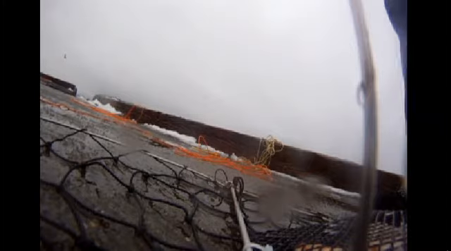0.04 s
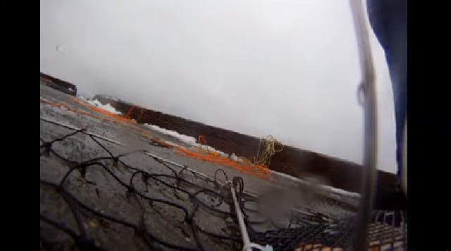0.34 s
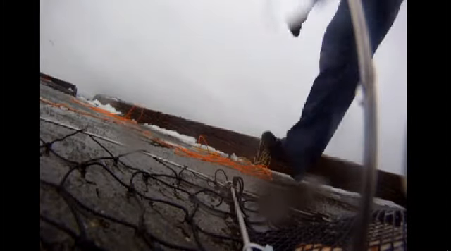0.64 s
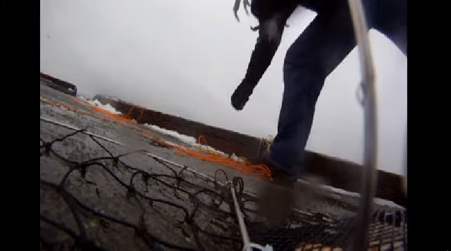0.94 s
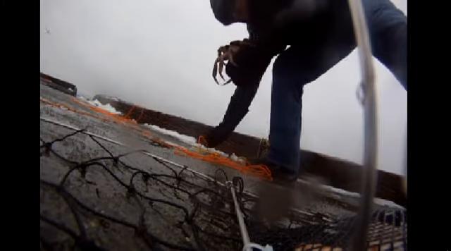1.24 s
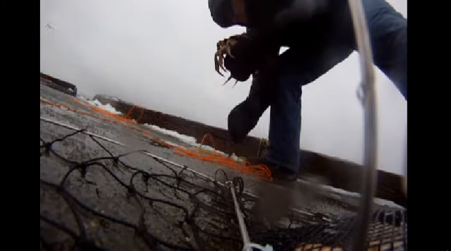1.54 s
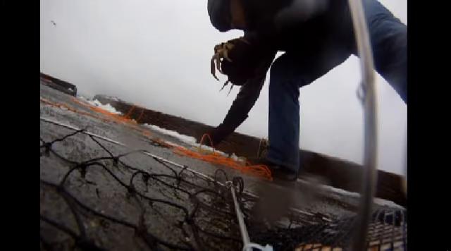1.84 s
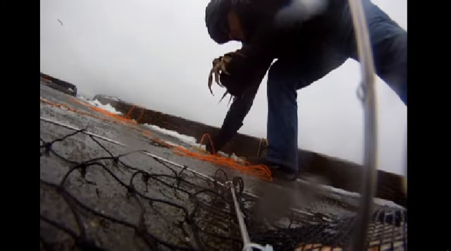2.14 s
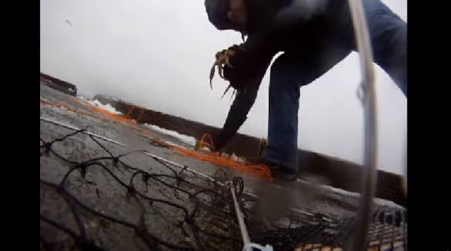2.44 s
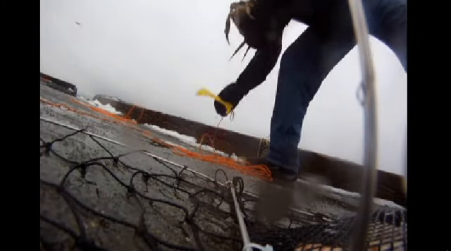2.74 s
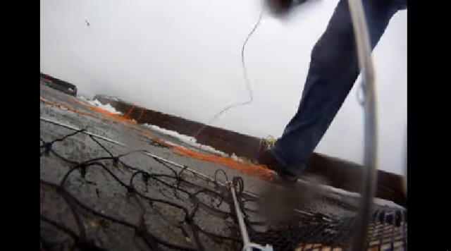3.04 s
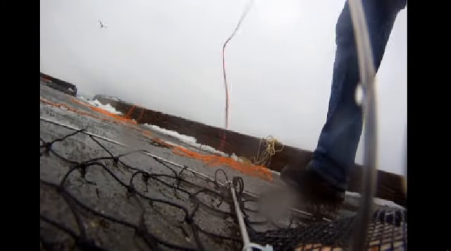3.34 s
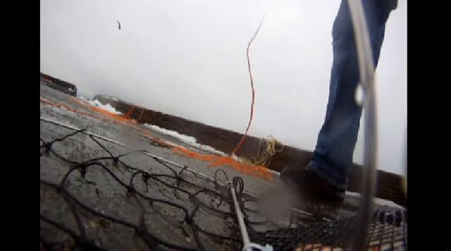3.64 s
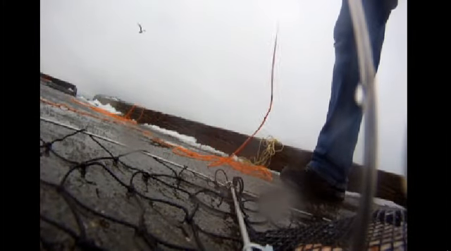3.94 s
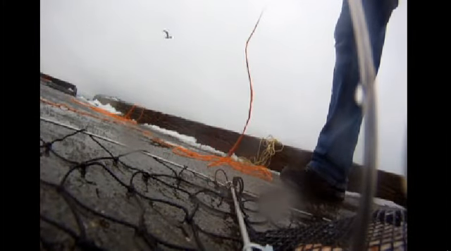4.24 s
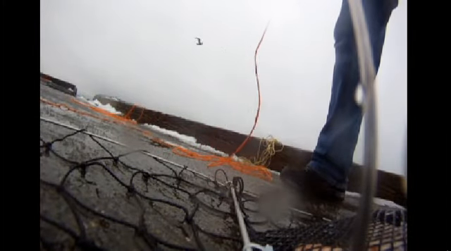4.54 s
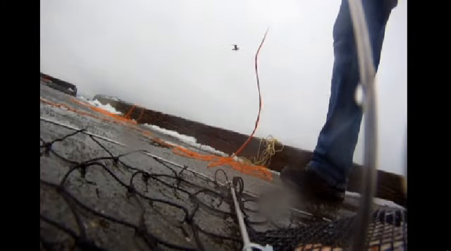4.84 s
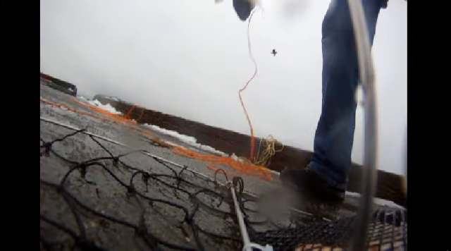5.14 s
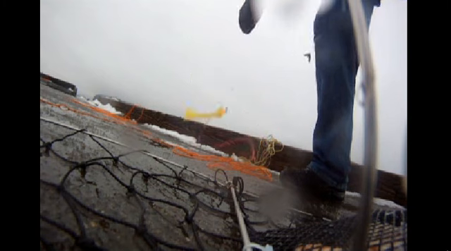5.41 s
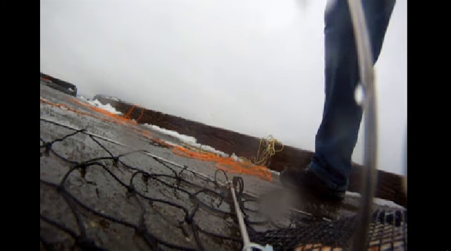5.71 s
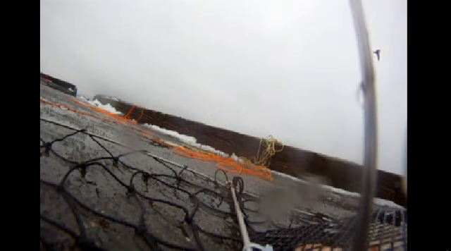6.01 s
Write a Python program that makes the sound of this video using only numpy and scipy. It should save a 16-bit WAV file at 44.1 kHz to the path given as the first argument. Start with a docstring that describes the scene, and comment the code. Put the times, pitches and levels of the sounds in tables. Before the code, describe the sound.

A wire crab trap knocks and scrapes very close on a pier, then settles, leaving faint drips, boot scuffs and rope rasps.

```python
"""Close, ringing knocks and scrapes: a wire crab trap comes to rest on a wet pier, heard from the
microphone of a camera fixed inside it. Each blow rings the frame; the cage sways and settles.
A few steps away boots scuff on grit, a jacket rustles and a line is picked up and paid out through
gloves. Drops tick on the camera's case, and near the end a plastic gauge clacks on the pier.
Behind it all lies a faint outdoor hush, with two brief, thin whistles."""
import sys
import numpy as np
from scipy import signal
from scipy.fft import rfft, irfft
from scipy.io import wavfile

SR = 44100
rng = np.random.default_rng(int(sys.argv[2]) if len(sys.argv) > 2 else 0)


def master(y):
    """Save y as 16-bit WAV."""
    cut = np.clip(np.atleast_2d(y).T, -1, 1)
    pcm = np.round(cut * 32767)  # scale
    wavfile.write(sys.argv[1], SR, pcm.astype(np.int16))


N = 267687
TIME = np.arange(N) / SR
FILTER_SAMPLES, RING_SAMPLES = 8192, 4096


def undb(db):
    """Decibels to gain."""
    return 10 ** (np.asarray(db) / 20)


def unit(x):
    """Scale to rms 1."""
    return x / np.sqrt(np.mean(x ** 2) + 1e-20)


def add(out, start_s, x):
    """Mix x in from start_s."""
    i = max(int(start_s * SR), 0)
    out[i:i + len(x)] += x[:max(N - i, 0)]


def colour(x, db_of):
    """Causal filter whose gain in dB is a function of frequency."""
    half = FILTER_SAMPLES // 2
    cepstrum = irfft(np.log(undb(db_of(np.linspace(1, SR / 2, half + 1)))))
    cepstrum[1:half] *= 2  # fold to minimum phase
    cepstrum[half + 1:] = 0
    impulse = irfft(np.exp(rfft(cepstrum)))
    return signal.oaconvolve(x, impulse)[:len(x)]


def shape(x, spectrum):
    """Filter by a curve of (freq_hz, level_db) points."""
    hz, db = np.transpose(spectrum)
    return colour(x, lambda f: np.interp(np.log(f), np.log(hz), db))


def tint(x, bass_db, treble_db, spot_hz, lift_db, bass_hz=850, treble_hz=2800, octaves=0.19):
    """Colour of one contact: weight adds bass, hardness adds treble, the spot lifts one band."""
    return colour(x, lambda f: bass_db / (1 + (f / bass_hz) ** 4)
                  + treble_db / (1 + (treble_hz / f) ** 4)
                  + lift_db * np.exp(-(np.log2(f / spot_hz) / octaves) ** 2))


def wander(rate_hz):
    """A random curve with a spread near 1."""
    knots = rng.standard_normal(int(N / SR * rate_hz) + 2)
    return np.interp(TIME * rate_hz, np.arange(len(knots)), knots)


def slips(per_s, spread_db):
    """Friction as tiny catches at random moments, of unequal size."""
    when, size, side = rng.random((int(per_s * N / SR), 3)).T
    catch_db = spread_db * np.minimum(-np.log(size), np.log(50))
    catches = np.sign(side - .5) * undb(catch_db)
    return unit(np.bincount((when * N).astype(int), catches, N))


def swell(t, rise_s, fall_s):
    """Pressure of one movement: it builds to 1 at t = 0 and lets go."""
    return np.exp(-2 * np.abs(t / np.where(t < 0, rise_s, fall_s)) ** 1.4)


def movements(table):
    """Joint strength of overlapping swells."""
    return np.sqrt(sum((undb(db) * swell(TIME - peak_s, swell_s, swell_s)) ** 2
                       for peak_s, db, swell_s in table))


def stroke(friction, body, peak_s, db, rise_s, fall_s, *tone):
    """One rub swells and dies away, sounding through a body tinted by tone."""
    out = np.zeros(N)
    span = slice(int((peak_s - 2 * rise_s) * SR), int((peak_s + 3 * fall_s) * SR))
    pressure = swell(TIME[span] - peak_s, rise_s, fall_s)
    rub = tint(body(friction[span]) * pressure, *tone)
    out[span] = rub * undb(db) * np.sqrt(np.sum(pressure ** 2) / np.sum(rub ** 2))
    return out


def blow(ringing, contact_s):
    """The ring builds up while the contact lasts; rms 1 over its first moments."""
    struck = ringing * np.minimum(TIME[:len(ringing)] / contact_s, 1)
    return struck / np.std(struck[:int((.005 + contact_s) * SR)])


# open air around the pier: freq_hz, level_db
AIR_SPECTRUM = [(15, -36.5), (25, -11), (70, -1), (99, -5), (153, -5), (317, -11), (887, -17), (1330, -17),
                (1890, -20.5), (3250, -25), (6050, -32), (8590, -32.5), (11900, -41), (14800, -35),
                (16000, -49.5)]
def hush(air_db=-63, rumble_hz=67, rumble_db=-70):
    """Open air: a soft hiss and a far, wavering rumble."""
    air = unit(shape(rng.standard_normal(N), AIR_SPECTRUM)) * undb(air_db + .6 * wander(6.1))
    rumble = colour(rng.standard_normal(N), lambda f: -20 * np.log10(1 + ((f - rumble_hz) / 12) ** 2))
    return air + unit(rumble) * undb(rumble_db + 1.2 * wander(2.3))


# faint whistles in the background: start_s, length_s, first_hz, last_hz, level_db
WHISTLE_GLIDES = [(3.722, 0.086, 4520, 4650, -61), (3.803, 0.27, 5750, 5240, -75)]
def whistles():
    """Each thin tone swells and bends away."""
    out = np.zeros(N)
    for start_s, length_s, first_hz, last_hz, db in WHISTLE_GLIDES:
        progress = np.linspace(0, 1, int(length_s * SR))
        pitch_hz = first_hz + (last_hz - first_hz) * progress ** 2
        tone = np.sin(2 * np.pi * np.cumsum(pitch_hz) / SR)
        add(out, start_s, undb(db) * np.sin(np.pi * progress) * tone)
    return out


# jacket cloth rubbing: freq_hz, level_db
CLOTH_SPECTRUM = [(200, -20), (900, -8.5), (1280, 0.5), (1600, -3.5), (2150, 2), (2800, -7.5), (3500, 1),
                  (4200, -9), (5000, -9), (7000, -15), (8500, -10), (10500, -12.5), (14500, -18),
                  (16500, -33.5)]
# bends and reaches a few steps away: peak_s, level_db, swell_s
JACKET_MOVES = [(1.11, -59.5, 0.16), (1.42, -58, .25), (2.34, -58, 0.13), (5.35, -66, 0.096),
                (5.73, -57.5, .14)]
def jacket(judder, still_db=-71.5, trim_db=-2):
    """Cloth rustles with each movement, and very faintly in between."""
    cloth = unit(shape(judder * slips(per_s=3600, spread_db=1.5), CLOTH_SPECTRUM))
    return cloth * undb(trim_db) * np.hypot(undb(still_db), movements(JACKET_MOVES))


# grit under a sole: freq_hz, level_db
GRIT_SPECTRUM = [(100, -14.5), (400, -10), (900, -11), (1260, 6.5), (1600, -0.5), (2200, 3.5), (2700, -5),
                 (3600, -6.5), (5000, -17.5), (8000, -17.5), (10000, -13), (14500, -20), (16500, -42)]
# scuffs on the pier, a few steps from the microphone: peak_s, level_db, rise_s, bass_db
BOOT_SCUFFS = [(1.005, -45, 0.015, -5.5), (1.034, -41.5, 0.024, -1.5), (3.24, -50.5, 0.069, 8.5),
               (3.303, -32, 0.005, -3.5), (3.323, -44.5, 0.03, -2), (3.917, -58, .016, 7),
               (5.834, -49, 0.0078, 6), (5.868, -55, 0.096, -16)]
def boots(judder, fall_ratio=1.37, treble_db=2, heel_hz=2200, heel_db=22, heel_s=0.0037):
    """Soles grind grit; the briefest contacts click like a heel."""
    out = np.zeros(N)
    friction = judder * slips(per_s=2200, spread_db=1.5)
    for peak_s, db, rise_s, bass_db in BOOT_SCUFFS:
        click_db = heel_db * np.exp(-rise_s / heel_s)
        out += stroke(friction, lambda x: shape(x, GRIT_SPECTRUM), peak_s, db,
                      rise_s, fall_ratio * rise_s, bass_db, treble_db, heel_hz, click_db)
    return out


# rope against gloves: freq_hz, level_db
ROPE_SPECTRUM = [(100, -26), (600, -17.5), (950, -19.5), (1220, -2), (1550, -14.5), (2200, -3.5),
                 (3000, -6), (4000, -4), (5500, -14.5), (8000, -12), (10000, -16), (14500, -26),
                 (16500, -19)]
# pulls on the line, a few steps away: peak_s, level_db, rise_s
LINE_PULLS = [(1.432, -52.5, 0.016), (1.825, -59, 0.1), (2.38, -48, 0.0077), (2.411, -47, 0.0083),
              (2.453, -49, 0.027), (2.589, -38.5, 0.1), (2.608, -30.5, .0045), (5.305, -53, .021),
              (5.599, -40.5, 0.046), (5.689, -50, 0.004), (5.749, -50, 0.017)]
def line(judder, bass_db=-1, treble_db=0, twang_hz=2200, twang_db=19.5, twang_s=.012):
    """The line rasps through gloves: long pulls hiss, short tugs twang."""
    out = np.zeros(N)
    friction = judder * slips(per_s=2800, spread_db=1.0)
    for peak_s, db, rise_s in LINE_PULLS:
        fall_s = 0.024 * (rise_s / 0.021) ** 0.43  # long pulls stop abruptly for their length
        lift_db = 4 + twang_db * np.exp(-rise_s / twang_s)
        out += stroke(friction, lambda x: shape(x, ROPE_SPECTRUM), peak_s, db,
                      rise_s, fall_s, bass_db, treble_db, twang_hz, lift_db)
    return out


# countless weak modes of the mesh around the microphone: freq_hz, level_db
MESH_SPECTRUM = [(100, -20.5), (350, -26), (700, -17), (930, -14.5), (1200, -3.5), (2000, 1), (2500, -6.5),
                 (3500, -5), (4800, -13.5), (6500, -18), (8500, -14.5), (10300, -9), (14500, -14),
                 (16500, -26.5)]
def ring(modes, t60_scale, mesh_db, mesh_t60_s, scatter_db=2.0, detune=.003):
    """A body's answer to one blow: each spot weights its modes differently; the mesh buzzes along."""
    t = TIME[:RING_SAMPLES]
    hz, db, t60_s = np.transpose(modes)[:, :, None]
    size, pitch, phase = rng.standard_normal((3, len(modes), 1))
    gain = undb(db + scatter_db * size)
    fade = -np.log(1000) * t / t60_scale
    tones = gain * np.sin(2 * np.pi * (hz * (1 + detune * pitch) * t + phase)) * np.exp(fade / t60_s)
    buzz = unit(shape(rng.standard_normal(len(t)), MESH_SPECTRUM)) * np.exp(fade / mesh_t60_s)
    return tones.sum(0) / np.sqrt(np.sum(gain ** 2) / 2) + undb(mesh_db) * buzz


# modes of the plastic gauge: pitch_hz, level_db, t60_s
GAUGE_MODES = [(714, -15, 0.087), (1210, -5.5, 0.057), (2548, 1, 0.062), (3540, 0.5, 0.046),
               (4020, 8, 0.028), (4200, 8.5, 0.024), (5340, -1.5, 0.026), (7900, 4.5, 0.031),
               (9400, -12, 0.074)]
# the gauge hits the pier: start_s, level_db
GAUGE_CLACKS = [(5.5452, -30), (5.5500, -29.5), (5.5707, -42)]
def gauge():
    """A small plastic plate lands on one edge, then flat, and bounces."""
    out = np.zeros(N)
    for start_s, db in GAUGE_CLACKS:
        plate = ring(GAUGE_MODES, t60_scale=0.96, mesh_db=-7, mesh_t60_s=0.02)
        add(out, start_s, undb(db) * blow(plate, contact_s=0.00022))
    return out


# modes of the camera's case, right at the microphone: pitch_hz, level_db, t60_s
CASE_MODES = [(640, -11.5, 0.022), (740, -13, 0.033), (1182, -6, 0.028), (1251, -3, 0.038),
              (1446, -17.5, 0.015), (1700, -11.5, 0.081), (1993, -0.5, 0.032), (2185, -1.5, 0.038),
              (2566, -2.5, 0.019), (2870, -10, 0.066), (3655, -15.5, 0.05), (5500, -32, 0.13),
              (10040, -23.5, 0.033), (10280, -7, 0.015), (13300, -11.5, 0.019)]
# drops landing on it: start_s, level_db, size (1 for an ordinary drop)
CASE_DROPS = [(1.142, -42.5, .7), (1.251, -39.5, 1.07), (1.6998, -23, 0.32), (1.855, -32, 0.15),
              (2.14, -44, .75), (2.717, -40.5, 0.69), (3.382, -39, 0.35), (3.7607, -37, 0.49),
              (4.2535, -33, 1.34), (4.341, -40.5, 0.98), (4.3691, -43, 1.2), (4.4494, -34.5, 1.01),
              (4.6437, -45.5, 0.88), (4.7265, -42, 0.94), (4.7557, -38.5, 1.05), (5.045, -40.5, 0.91),
              (5.096, -42, 0.98), (5.1295, -37.5, 1.02), (5.1352, -43, 1.16), (5.4686, -40, 1)]
def drops(ordinary_hz=1350, thin_db=-13, trim_db=-0.5):
    """Each drop rings the plastic case; the smaller it is, the shorter, higher and thinner the tick."""
    out = np.zeros(N)
    for start_s, db, size in CASE_DROPS:
        treble_db = -4.5 - 4 * np.log2(size)
        case = ring(CASE_MODES, t60_scale=size, mesh_db=-0.5, mesh_t60_s=0.043)
        case = tint(case, thin_db * (1 - size), treble_db, ordinary_hz / np.sqrt(size), lift_db=7)
        tick = blow(case, contact_s=0.00059)
        add(out, start_s, undb(db + trim_db) * tick / np.abs(tick).max())
    return out


def tremble(held_db=-46.5, let_go_s=0.735, settle_db_per_s=141):
    """Strength of the cage's shaking: steady while it is held, then dying away."""
    return undb(held_db - settle_db_per_s * np.maximum(TIME - let_go_s, 0))


# low modes of the frame that carries the microphone: pitch_hz, width_hz, level_db
SWAY_MODES = [(60, 22, 1.5), (138, 40, 0), (261, 21, -6.5)]
# shoves on the cage: peak_s, level_db, swell_s
CAGE_SHOVES = [(.09, -39.5, .035), (.205, -36.5, .025), (.43, -31, .05), (.568, -32.5, .018),
               (.745, -38.5, .04)]
def rocking(trim_db=-1.5, floor_db=-18):
    """The whole cage sways with each shove and shakes the camera until it settles."""
    def response_db(f):
        floor = undb(floor_db) / (1 + (f / 300) ** 4 + (70 / f) ** 4)
        peaks = sum(undb(db) / (1 + (2 * (f - hz) / width) ** 2) for hz, width, db in SWAY_MODES)
        return 20 * np.log10(floor + peaks)
    sway = unit(colour(rng.standard_normal(N), response_db))
    return sway * undb(trim_db) * np.hypot(tremble(), movements(CAGE_SHOVES))


# modes of the trap and the case it carries, heard from inside: pitch_hz, level_db, t60_s
TRAP_MODES = [(488, -24, 0.092), (650, -19.5, .14), (724.5, -13.5, 0.1), (795, -17.5, .09), (1153, -5, .06),
              (1245, -8.5, 0.077), (1343, -1.5, 0.07), (1473, -7, .06), (1614, -2, 0.073),
              (1646, -5.5, .08), (1913, -2, 0.088), (2080, -6.5, 0.052), (2177, -3, .08), (2230, -11, .05),
              (2495, -11.5, .05), (2816, -6, 0.085), (3017, -17, .05), (3267, -6.5, 0.064),
              (3540, -8.5, 0.041), (3725, -5.5, .05), (4340, -12.5, .05), (4670, -16, 0.055),
              (5320, -14, 0.035), (6600, -21.5, 0.077), (7380, -17, 0.058), (8380, -12, 0.065),
              (8750, -19.5, .05), (9700, -18, 0.017), (9350, -9.5, 0.018)]
def dragging_frame(catches, rasp_db=-5):
    """Catches ring the damped frame from a new spot on every stroke; grit rasps in the mesh."""
    pressed = ring(TRAP_MODES, t60_scale=.65, mesh_db=-8.5, mesh_t60_s=.04)
    frame = signal.oaconvolve(catches, pressed)[:len(catches)]
    return unit(frame) + undb(rasp_db) * unit(shape(catches, MESH_SPECTRUM))


def jangle(trim_db=-7):
    """Loose wire chatters faintly as long as the cage trembles."""
    return unit(dragging_frame(slips(per_s=600, spread_db=2.5))) * undb(trim_db) * tremble()


# wire drags on the pier, just under the microphone: peak_s, level_db, length_s, spot_hz
WIRE_SCRAPES = [(.368, -20.5, .055, 1547), (.401, -22, .021, 1480), (.434, -25, 0.07, 729.6),
                (0.49, -27.5, .04, 1130), (0.517, -19.5, 0.031, 1653), (0.535, -13.5, 0.043, 1630),
                (.584, -23.5, .04, 1630), (.66, -34, 0.084, 1350), (.741, -20.5, 0.042, 1230),
                (.800, -23.5, 0.063, 1925), (0.866, -44, 0.1, 1250)]
def scrapes(light_load_hz=1650, rise_share=.53, treble_db=-0.5):
    """The wire catches and slips on concrete, groaning lower and fuller under load."""
    out = np.zeros(N)
    friction = slips(per_s=1200, spread_db=2.0)
    for peak_s, db, length_s, spot_hz in WIRE_SCRAPES:
        load_octaves = np.log2(light_load_hz / spot_hz)
        bass_db = -1.5 + 14.5 * load_octaves
        lift_db = 3 + 5.5 * load_octaves
        rise_s = length_s * rise_share
        out += stroke(friction, dragging_frame, peak_s, db,
                      rise_s, length_s - rise_s, bass_db, treble_db, spot_hz, lift_db)
    return out


# the frame strikes the pier, very close: start_s, level_db, contact_s, spot_hz, lift_db, bass_db
FRAME_KNOCKS = [(0.0656, -14.5, 0.0022, 2250, 7, -2.5), (0.134, -12.5, 0.0025, 2290, 4, -6),
                (0.1868, -21, 0.0088, 2140, 6.5, 8.5), (0.293, -32, .005, 1415, 2, 13.5),
                (.3400, -14.5, 0.0031, 1120, 8.5, 7), (0.344, -10, .0022, 1107, 17.5, 3),
                (0.429, -25, .001, 1276, 11, 8), (0.4702, -3, .0021, 1980, 5, 8),
                (0.5732, -7, .005, 1253, 7.5, -16), (0.647, -34.5, .002, 2010, 5, 4),
                (0.7162, -22.5, 0.0011, 1750, 11, 4)]
def knocks(grounded_s=.32, firm_db=-15.5, thud_db=-13, thud_hz=350, thud_t60_s=0.0055):
    """Blows ring the frame, the harder the brighter; weight behind them adds a dull thud."""
    out = np.zeros(N)
    t = TIME[:RING_SAMPLES]
    thud = undb(thud_db) * np.sin(2 * np.pi * thud_hz * t) * np.exp(-np.log(1000) * t / thud_t60_s)
    for start_s, db, contact_s, spot_hz, lift_db, bass_db in FRAME_KNOCKS:
        force_db = db - firm_db
        # once grounded the frame rings shorter, and shorter still under a hard blow
        t60_scale = 0.93 if start_s < grounded_s else 0.59 * .5 ** (max(force_db, 0) / 12.5)
        treble_db = 1.5 + 0.3 * force_db
        frame = ring(TRAP_MODES, t60_scale, mesh_db=-4.5, mesh_t60_s=0.068)
        frame = tint(frame, bass_db, treble_db, spot_hz, lift_db)
        add(out, start_s, undb(db) * (blow(frame, contact_s) + undb(bass_db) * thud))
    return out


def scene(judder_db=3):
    """Everything reaches one microphone inside the trap."""
    judder = undb(judder_db * wander(220))  # an unsteady grip roughens the friction
    handling = jacket(judder) + boots(judder) + line(judder)
    trap = rocking() + jangle() + scrapes() + knocks()
    return np.tile(hush() + whistles() + handling + gauge() + drops() + trap, (2, 1))


# two narrow notches in the treble, near 6 and 12 kHz: centre_hz, width_hz, gain_db
TREBLE_NOTCHES = [(6010, 380, -12), (11930, 820, -39)]
def record(dry, side_db=-35, side_lag_s=.004, top_hz=15900):
    """The hardest blows are rounded, the treble is notched and the top cut; the image is nearly mono."""
    rounded = dry[0] / (1 + dry[0] ** 4) ** .25
    mid = colour(rounded, lambda f: sum(db * np.exp(-((f - hz) / width) ** 2)
                                        for hz, width, db in TREBLE_NOTCHES))
    side = undb(side_db) * np.interp(TIME - side_lag_s, TIME, mid, left=0)
    lowpass = signal.ellip(8, .2, 70, top_hz, fs=SR, output="sos")
    return signal.sosfilt(lowpass, [mid + side, mid - side])


dry = scene()
out = record(dry)
master(out)
```